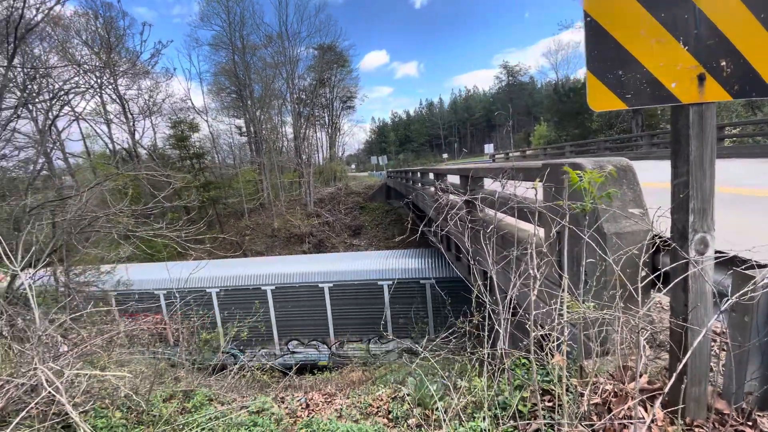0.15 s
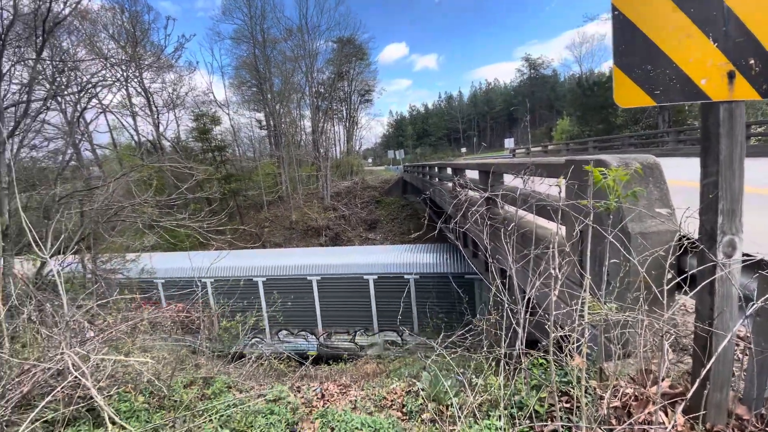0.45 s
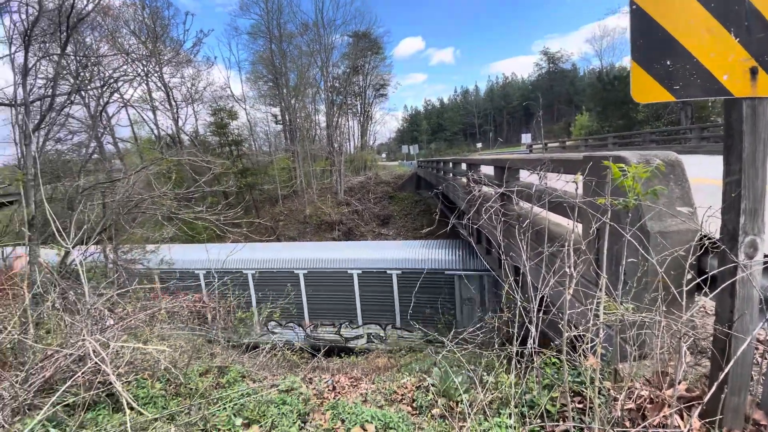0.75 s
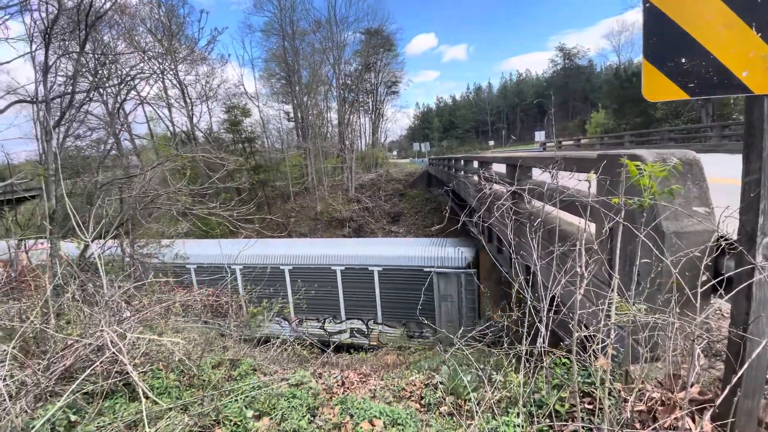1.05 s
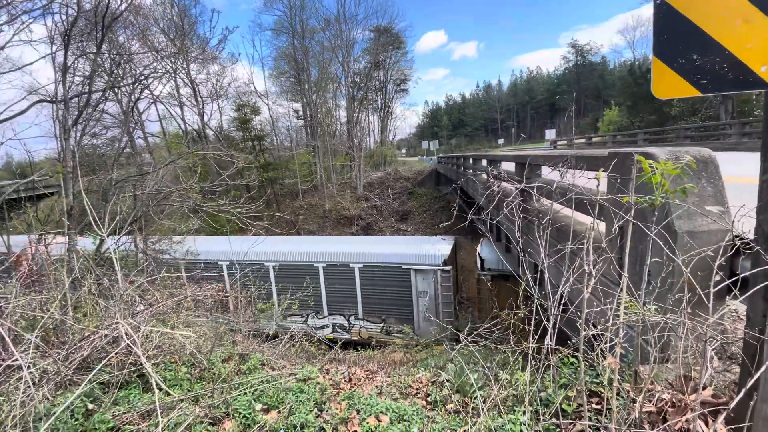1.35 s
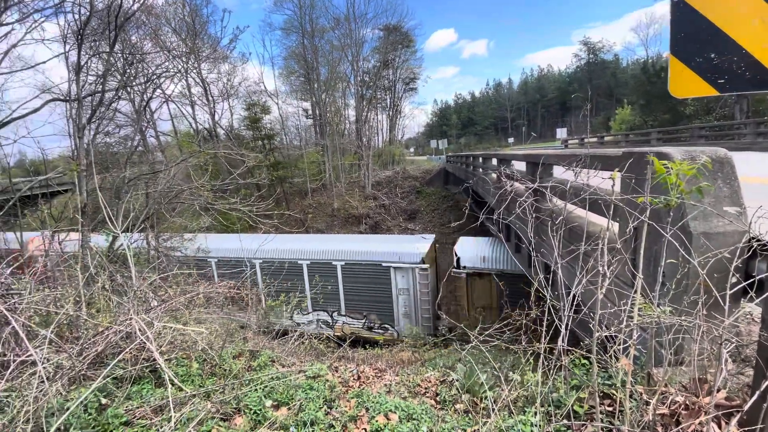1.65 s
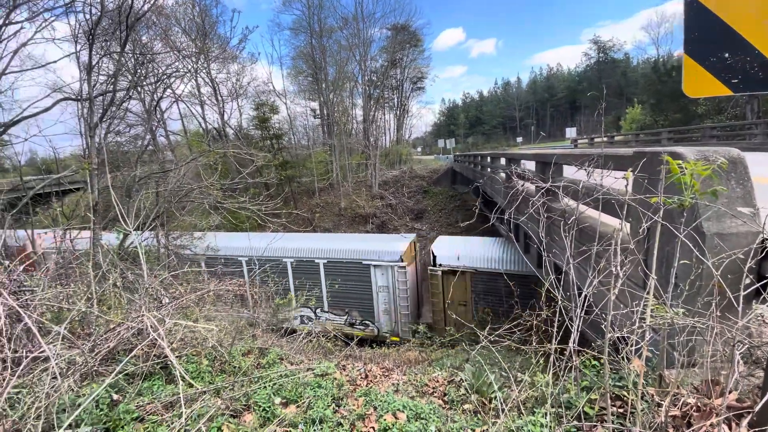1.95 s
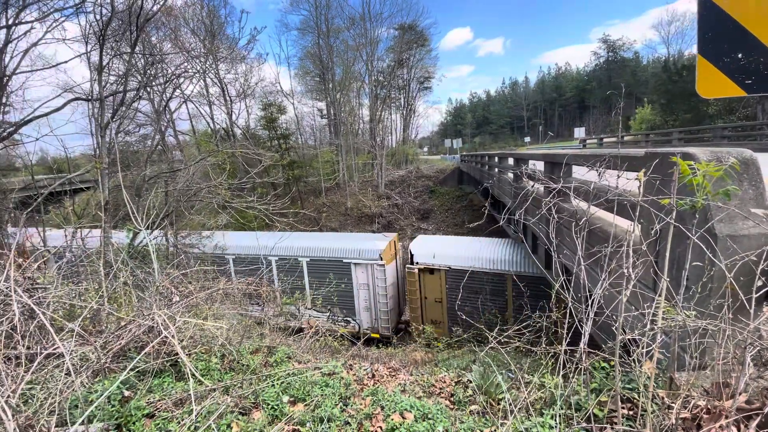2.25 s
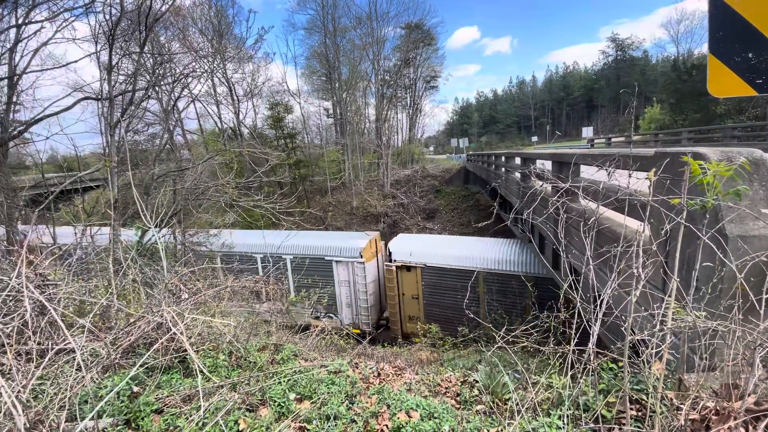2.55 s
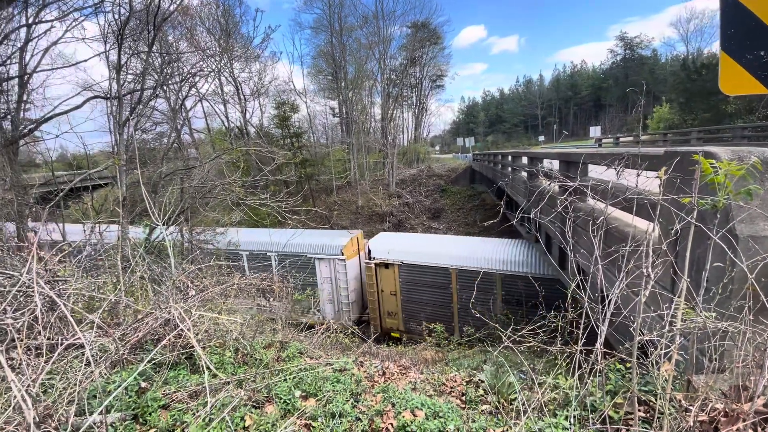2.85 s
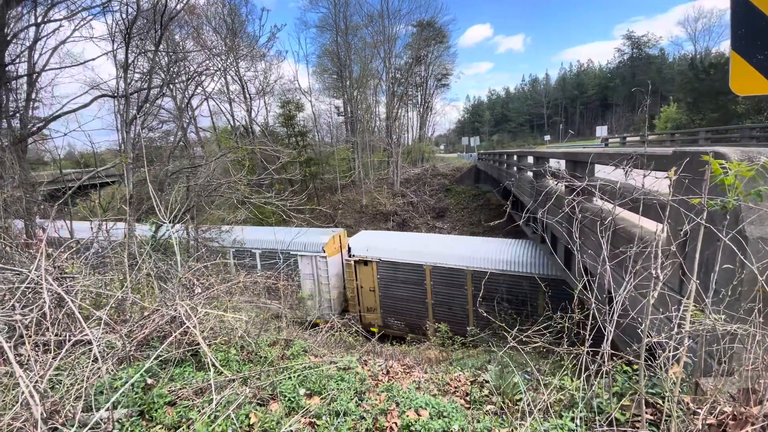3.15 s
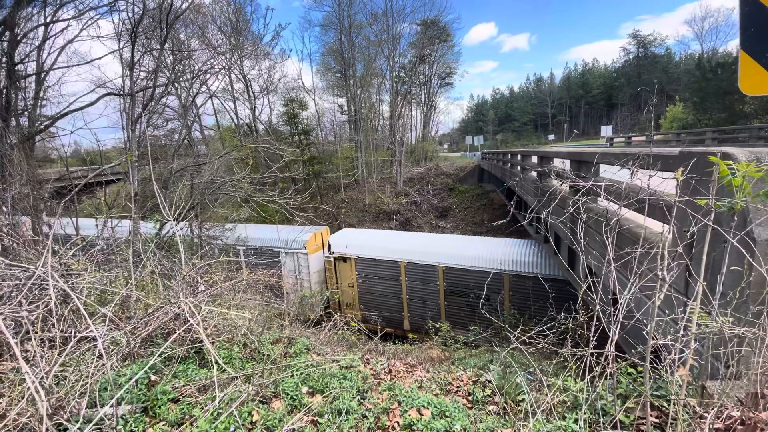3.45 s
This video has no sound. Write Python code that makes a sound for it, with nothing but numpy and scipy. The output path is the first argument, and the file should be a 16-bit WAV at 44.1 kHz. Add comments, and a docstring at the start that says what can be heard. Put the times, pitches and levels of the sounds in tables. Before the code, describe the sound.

A freight train rolls steadily under a road bridge, heard in stereo from the bank above. Deep rumble, rail roar and fine hiss run throughout. A light flange rub swells near 0.7 s with a hollow knock; dull booms follow, strongest around 1-2 s. A hard, ringing grind with faint sinking squeals lasts about 1.1-1.6 s. From 2.3 s come short gritty scrapes, another knock at 2.55 s and faint wheel singing.

```python
"""A freight train of long cars rolls under a road bridge, heard from the bank above.
From the start cars rumble, rails roar and hiss, and flanges rub: all are shaped noise.
Wheels sing faintly now and then as wavering tones; dull sine booms and a hollow knock follow.
After 1.1 s a flange grinds hard for half a second, with ringing noise and sinking squeals.
From 2.3 s a wheel scrapes in short strokes of noise; a second decaying-sine knock sounds."""
import sys
import numpy as np
from scipy import signal
from scipy.fft import rfft, irfft, next_fast_len
from scipy.io import wavfile
from scipy.ndimage import uniform_filter1d, map_coordinates

SR = 44100
rng = np.random.default_rng(int(sys.argv[2]) if len(sys.argv) > 2 else 0)


def generate_wav(signal):
    """Clip the signal to [-1, 1] and save it as 16-bit WAV at the path in sys.argv[1]."""
    frames = np.transpose(np.atleast_2d(signal))
    scaled = np.clip(frames, -1, 1) * 32767
    pcm = np.round(scaled).astype(np.int16)
    wavfile.write(sys.argv[1], SR, pcm)


N = 158760
TIME_S = np.arange(N) / SR
LEFT_RIGHT = np.array([[.5], [-.5]])  # splits a left-minus-right difference

# car rumble and drumming car sides: start_s, level_db
RUMBLE_LEVEL = [(0, -29), (.4, -24), (1.15, -23.5), (1.4, -28), (1.95, -23), (2.6, -26.5), (3.6, -25.5)]
SIDES_LEVEL = [(0, -35), (.9, -33.5), (1.3, -33), (1.85, -33), (2.3, -35), (3.6, -36.5)]
# their spectra: freq_hz, relative_db
RUMBLE_SPECTRUM = [(20, -49), (30, -11), (40, -16.5), (50, -0.5), (64, 0), (80, 0.5), (98, 2), (120, -8),
                   (150, -18.5), (350, -57.5)]
SIDES_SPECTRUM = [(30, -60), (80, -13.5), (130, -1), (170, 2), (220, -4.5), (300, -8.5), (400, -13),
                  (520, -19), (700, -24.5), (1200, -69)]
# dull booms: centre_s, peak_db, pitch_hz
BOOMS = [(.73, -24, 95), (1.01, -13, 82), (1.14, -20.5, 56), (1.57, -17.5, 70.8), (1.822, -14, 92.1),
         (2.039, -15, 71.9), (2.995, -15.5, 73.53)]
# balance of the cars, left, then right, then centre: start_s, left_over_right_db
CAR_DRIFT = [(0, -0.5), (.4, 3), (.9, 3), (1.25, -1.5), (3.6, 0)]
BOOM_SD_S = 0.0098
RUMBLE_EVENING = .2  # exponent: 0 leaves the swell, 1 flattens it

# rolling roar and steel hiss: start_s, level_db
ROAR_LEVEL = [(0, -44), (.75, -39.5), (1.08, -41.5), (1.8, -40), (2.8, -40), (3.6, -40.5)]
HISS_LEVEL = [(0, -40.5), (.4, -41), (.5, -39), (.68, -44.5), (.8, -54.5), (1.11, -46.5), (1.18, -44),
              (1.5, -44), (1.8, -45.5), (2.5, -44.5), (2.7, -41), (2.95, -43), (3.6, -42.5)]
# their spectra: freq_hz, relative_db
ROAR_SPECTRUM = [(300, 3), (550, 2.5), (740, -4), (950, 6.5), (1150, 2.5), (1450, -4), (2100, -2),
                 (2800, -0.5), (3500, -4.5), (5200, -6), (6000, -18.5), (9000, -14.5)]
HISS_SPECTRUM = [(1500, -4), (3500, 3.5), (5300, 5.5), (6000, 3.5), (7500, 3.5), (9200, 3.5), (11000, 3.5),
                 (13000, 4), (15000, -8)]

# flange contact, light and hard: start_s, level_db
RUB_LEVEL = [(0, -43.5), (.39, -43.5), (.47, -39), (.68, -36), (.77, -43), (1.0, -47), (1.2, -77)]
GRIND_LEVEL = [(1.08, -93), (1.125, -45), (1.155, -33.5), (1.19, -30), (1.255, -34), (1.33, -30),
               (1.45, -30), (1.55, -33), (1.63, -39.5), (1.9, -65)]
# their spectra: freq_hz, relative_db
RUB_SPECTRUM = [(400, -8.5), (900, -8.5), (1500, -5), (2600, -1), (3400, -3.5), (4600, -2.5), (6200, -2),
                (8000, -7.5), (14000, -20)]
GRIND_SPECTRUM = [(500, -57), (850, 0.5), (1200, 5), (1550, 4), (2200, 7.5), (2700, 5), (3500, 2.5),
                  (4600, 3.5), (5500, 1), (7000, -5), (12000, -7.5), (15000, -18)]
# wheel resonances under each contact: freq_hz, half_width_hz, relative_db
RUB_MODES = [(2680, 240, -1.5), (3770, 55, 0), (4110, 37, 4.5), (5260, 47, 3)]
GRIND_MODES = [(2520, 63, -2.5), (3030, 14, 6), (3030, 14, 6.5), (4020, 28, 2), (4140, 32, 0),
               (5060, 47, 6), (5990, 24, -2), (9140, 69, -5)]
RUB_RING_DB, GRIND_PEAK_RING_DB = -3, -2  # ring relative to contact noise
RING_GROWTH_DB_PER_DB = 0.29  # extra ring for harder grinding
GRIND_JUDDER_DB = 0.85

# singing wheels, squealing flange: centre_s, sd_s, pitch_hz, level_db, flutter_db
SINGS = [(0.092, 0.15, 384, -44.5, -0.5), (0.516, 0.069, 3785, -45.5, 3), (1.988, 0.081, 4090, -48, 4),
         (2.667, 0.22, 4075, -45, 4), (2.62, 0.038, 4075, -37, 0.5), (2.818, 0.24, 2570, -48, 2.5),
         (3.25, 0.36, 4095, -48.5, 3), (3.388, 0.19, 2580, -46.5, 4.5)]
SQUEALS = [(1.396, 0.071, 2165, -41.5, 5.5), (1.421, 0.049, 4065, -39.5, 0)]
SING_WAVER_HZ, SQUEAL_FALL_PER_S = 22.15, .35

# hollow knocks: start_s, level_db (before the side gains), pitch_hz
KNOCKS = [(.667, -22.5, 800), (2.554, -19.5, 755)]
KNOCK_T60_S, KNOCK_ATTACK_S, KNOCK_RIGHT_DELAY_S = 0.014, 0.0008, 0.0006
KNOCK_LEFT_GAIN_DB, KNOCK_RIGHT_GAIN_DB = 6, -2

# wheel scrapes: peak_s, level_db
SCRAPES = [(2.357, -37), (2.618, -33.5), (2.715, -36.5), (2.835, -39), (3.02, -38.5), (3.063, -36.5),
           (3.142, -35), (3.163, -38.5), (3.225, -39.5), (3.268, -32.5), (3.378, -34), (3.402, -37),
           (3.445, -40), (3.55, -33.5)]
# scrape spectrum: freq_hz, relative_db
SCRAPE_SPECTRUM = [(700, -27), (1400, -7), (2000, 0.5), (3000, -0.5), (4300, 2.5), (5300, -7), (7000, -16),
                   (13000, -21)]
SCRAPE_RISE_S, SCRAPE_FALL_S = 0.01, 0.03  # exponential time constants

# noise likeness of the two sides: freq_hz, correlation (clipped to +-0.98)
ALIKE = [(70, 0.7), (250, 0.67), (420, 0.27), (650, -0.47), (1150, 0.16), (2300, 0.16), (3500, -0.05),
         (5600, -0.28), (7500, 0.6), (8500, -0.28), (10200, 0.13), (11500, 1.5), (13300, -0.2),
         (14000, -2.4)]
# phase lead of the left: freq_hz, lead_rad
LEAD = [(30, 0), (100, 0.45), (300, 0.51), (800, 0), (2100, 0), (4000, 0)]
# colour difference: freq_hz, left_over_right_db
BALANCE = [(100, -1.1), (350, -5.5), (730, 3), (1300, .5), (2500, 2.5), (5000, 1.5), (7800, -1), (8500, -9),
           (9400, -11), (10200, -5.5), (11000, 0)]
TOP_HZ = 15050


def amp(db):
    """Decibels to gain."""
    return 10 ** (np.asarray(db) / 20)


def unit(x):
    """Scale to rms 1."""
    return x / np.sqrt(np.mean(x ** 2) + 1e-20)


def along(points, hz):
    """Read (freq_hz, value) points on a log axis."""
    freq_hz, value = np.transpose(points)
    return np.interp(np.log(hz + 1), np.log(freq_hz + 1), value)


def curve(rows):
    """Read (start_s, value) rows at every sample."""
    return np.interp(TIME_S, *np.transpose(rows))


def wobble(rate_hz):
    """Smooth random curve with rate_hz knots a second."""
    return map_coordinates(rng.standard_normal(1024), [TIME_S * rate_hz], mode="wrap")


def filtered(x, response):
    """Apply a frequency response by FFT."""
    size = next_fast_len(N + 8192)
    spectrum = rfft(x, size) * response(np.fft.rfftfreq(size, 1 / SR))
    return irfft(spectrum, size)[..., :N]


def noise(response):
    """Stereo noise of rms 1; the mid/side mix sets the left-right correlation."""
    def mid_side_response(hz):
        angle = np.arccos(np.clip(along(ALIKE, hz), -.98, .98)) / 2
        return response(hz) * np.array([np.cos(angle), np.sin(angle)])
    source = rng.standard_normal((2, next_fast_len(N + 8192)))
    mid, side = filtered(source, mid_side_response)
    return unit(np.array([mid + side, mid - side]))


def rush(spectrum, ripple_db=0, ripple_hz=90):
    """Broad stereo noise of a given spectrum, with an optional random ripple over frequency."""
    knots = rng.standard_normal(1024)

    def response(hz):
        ripple = map_coordinates(knots, [hz / ripple_hz], mode="wrap")
        return amp(along(spectrum, hz) + ripple_db * ripple)
    return noise(response)


def ringing(modes):
    """Noise through resonances that friction keeps ringing."""
    def response(f):
        power = sum(amp(db) ** 2 / (1 + ((f - hz) / half_width_hz) ** 2) ** 2
                    for hz, half_width_hz, db in modes)
        return np.sqrt(power)
    return noise(response)


def patchy(x, depth_db):
    """Give noise random patches of gain in time and frequency."""
    bins = signal.stft(x, nperseg=512)[2]
    field = rng.standard_normal(bins.shape[1:])
    field = uniform_filter1d(field, size=4, axis=0)
    field = uniform_filter1d(field, size=6, axis=1)
    gain = amp(depth_db * unit(field))
    return unit(signal.istft(bins * gain, nperseg=512)[1][:, :N])


def cars():
    """Heavy cars rumble with slightly evened swell, boom now and then, and their steel sides drum."""
    roll = rush(RUMBLE_SPECTRUM)
    swell = np.abs(signal.hilbert(roll)).mean(axis=0)
    rumble = amp(curve(RUMBLE_LEVEL)) * unit(roll / swell ** RUMBLE_EVENING)
    sides = amp(curve(SIDES_LEVEL) + 1.57 * wobble(16)) * rush(SIDES_SPECTRUM)
    booms = np.zeros(N)
    for centre_s, peak_db, hz in BOOMS:
        envelope = amp(peak_db) * np.exp(-((TIME_S - centre_s) / BOOM_SD_S) ** 2 / 2)
        booms += envelope * np.sin(2 * np.pi * (hz * TIME_S + rng.random()))
    return (rumble + sides + booms) * amp(LEFT_RIGHT * curve(CAR_DRIFT))


def rails():
    """Wheels roar on the rails under a fine steel hiss; both are rippled noise."""
    roar_gain = amp(curve(ROAR_LEVEL) + 1.1 * wobble(25))
    roar = roar_gain * rush(ROAR_SPECTRUM, ripple_db=1.0, ripple_hz=43)
    hiss_gain = amp(curve(HISS_LEVEL) + 0.51 * wobble(30.4))
    hiss = hiss_gain * rush(HISS_SPECTRUM, ripple_db=2.2, ripple_hz=110)
    return roar + hiss


def flanges():
    """A light rub, then a juddering grind; the harder it presses, the more the wheel rings."""
    rub_noise = patchy(rush(RUB_SPECTRUM), depth_db=0.4)
    rub = amp(curve(RUB_LEVEL)) * (rub_noise + amp(RUB_RING_DB) * ringing(RUB_MODES))
    force_db = curve(GRIND_LEVEL)
    rasp = patchy(rush(GRIND_SPECTRUM, ripple_db=1.5, ripple_hz=44), depth_db=1.6)
    ring_db = GRIND_PEAK_RING_DB + RING_GROWTH_DB_PER_DB * (force_db - force_db.max())
    ring = amp(ring_db) * patchy(ringing(GRIND_MODES), depth_db=3)
    grind = amp(force_db + GRIND_JUDDER_DB * wobble(60.25)) * (rasp + ring)
    return rub + grind


def wheel_tone(centre_s, sd_s, hz, level_db, flutter_db, fall_per_s=0):
    """One wheel mode swells and fades as a thin tone that wavers and flutters."""
    t = TIME_S - centre_s
    pitch_hz = hz * np.exp(-fall_per_s * t) + SING_WAVER_HZ * wobble(140)
    phase = 2 * np.pi * np.cumsum(pitch_hz) / SR
    spread_rad = LEFT_RIGHT * wobble(20)
    envelope = amp(level_db + flutter_db * wobble(70)) * np.exp(-(t / sd_s) ** 2 / 2)
    return np.sqrt(2) * envelope * np.sin(phase + spread_rad)


def singing_wheels():
    """Rolling wheels waver about a fixed pitch; squeals of the grinding one sink."""
    sings = sum(wheel_tone(*row) for row in SINGS)
    squeals = sum(wheel_tone(*row, SQUEAL_FALL_PER_S) for row in SQUEALS)
    return sings + squeals


def knocks():
    """Short hollow knocks close on the left: decaying sines, later and weaker on the right."""
    out = np.zeros((2, N))
    for start_s, level_db, hz in KNOCKS:
        t = np.maximum(TIME_S - start_s - np.array([[0], [KNOCK_RIGHT_DELAY_S]]), 0)
        decay = amp(level_db - 60 * t / KNOCK_T60_S)
        attack = 1 - np.exp(-t / KNOCK_ATTACK_S)
        out += decay * attack * np.sin(2 * np.pi * hz * t)
    return out * amp([[KNOCK_LEFT_GAIN_DB], [KNOCK_RIGHT_GAIN_DB]])


def scraping_wheel():
    """A wheel touches the rail's edge in short strokes of gritty, patchy noise."""
    strokes = np.zeros(N)
    for peak_s, level_db in SCRAPES:
        rise = (peak_s - TIME_S) / SCRAPE_RISE_S
        fall = (TIME_S - peak_s) / SCRAPE_FALL_S
        strokes += amp(level_db) * np.exp(-np.maximum(rise, fall))
    grit = amp(1.5 * wobble(180))
    return strokes * grit * patchy(rush(SCRAPE_SPECTRUM), depth_db=1.8)


def scene():
    """Sum all parts of the passing train."""
    return cars() + rails() + flanges() + singing_wheels() + knocks() + scraping_wheel()


def record(dry):
    """Left and right differ in colour and phase; nothing above TOP_HZ is kept."""
    def response(hz):
        colour = amp(LEFT_RIGHT * along(BALANCE, hz))
        phase = np.exp(1j * LEFT_RIGHT * along(LEAD, hz))
        return colour * phase * (hz < TOP_HZ)
    return filtered(dry, response)


dry = scene()
out = record(dry)
generate_wav(out)
```